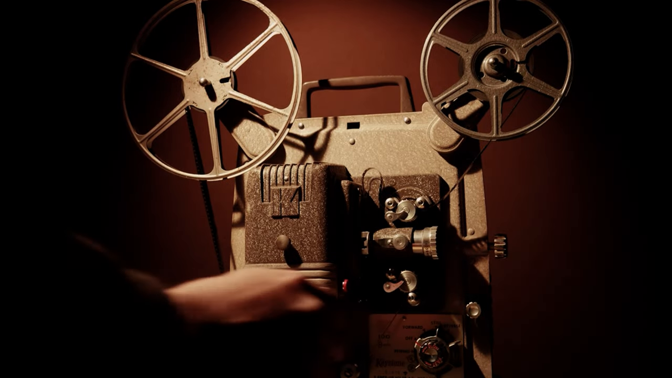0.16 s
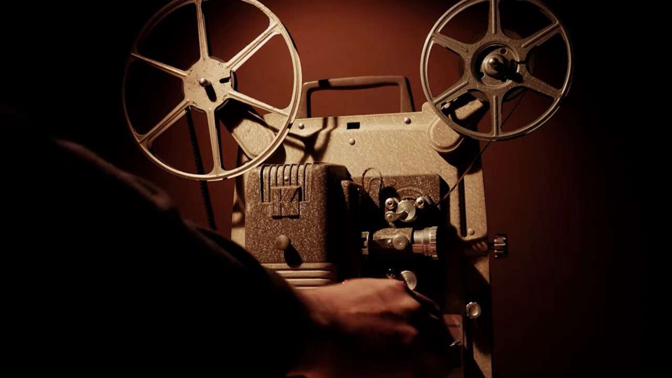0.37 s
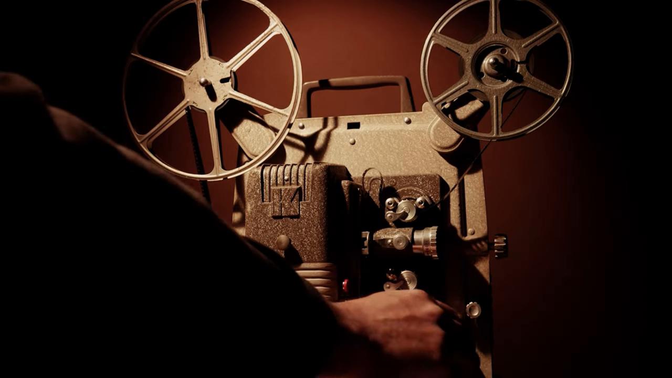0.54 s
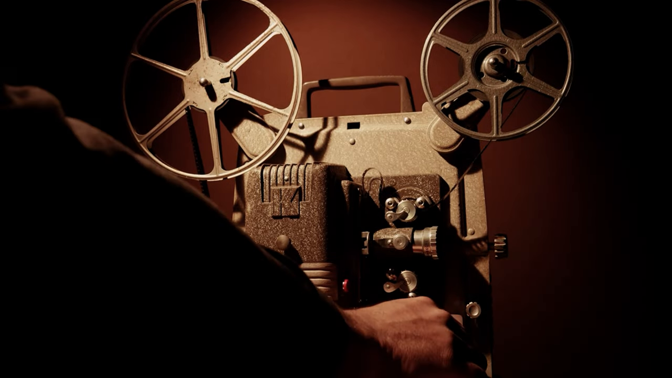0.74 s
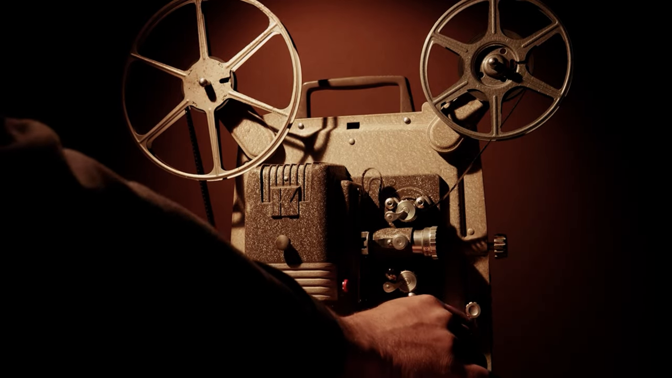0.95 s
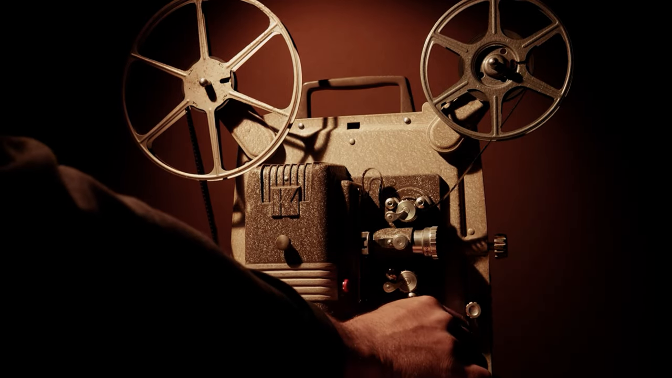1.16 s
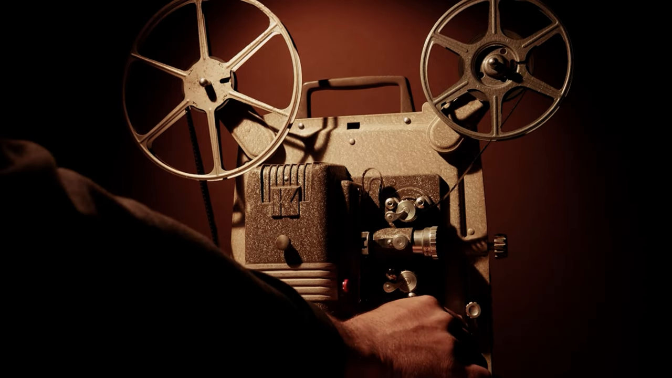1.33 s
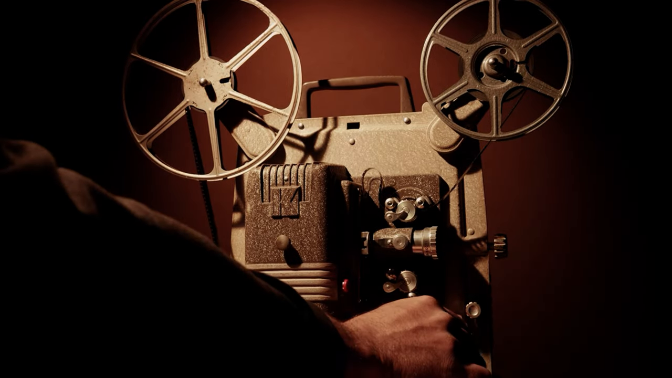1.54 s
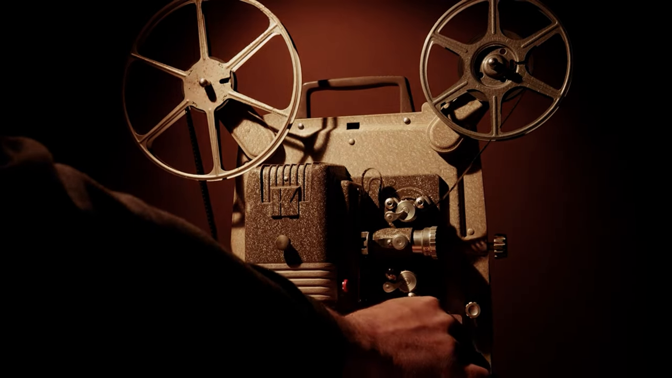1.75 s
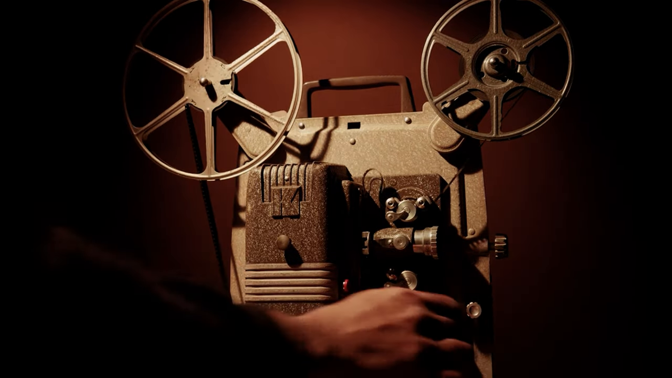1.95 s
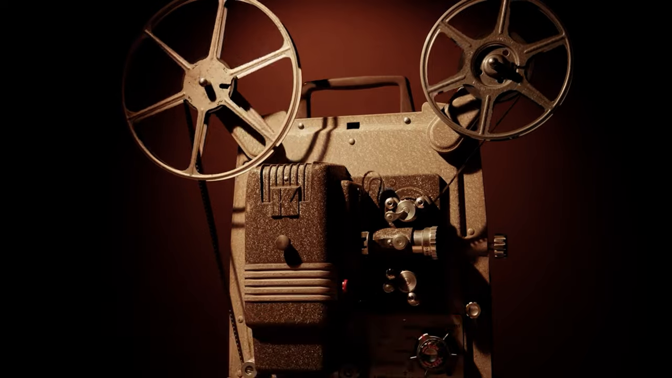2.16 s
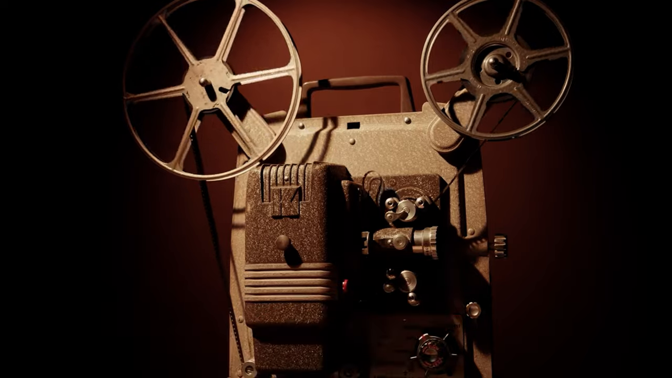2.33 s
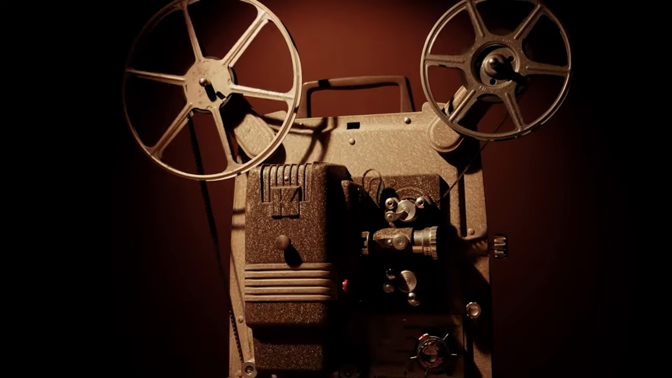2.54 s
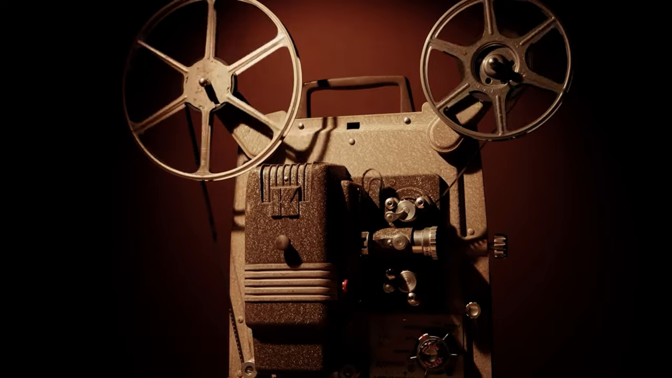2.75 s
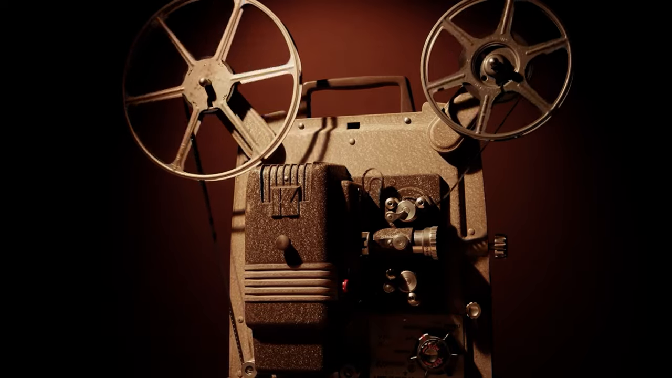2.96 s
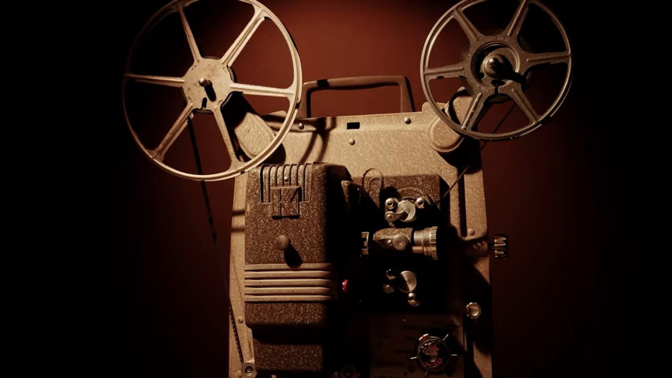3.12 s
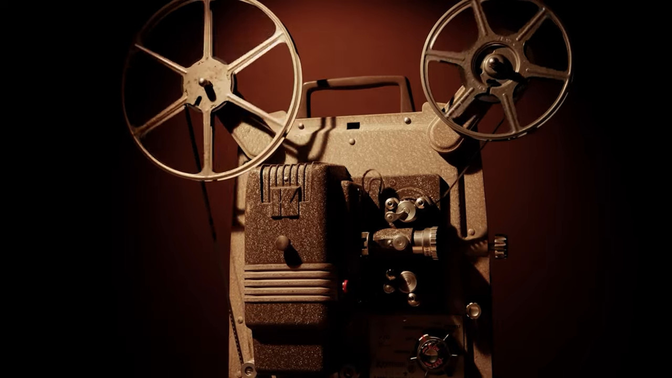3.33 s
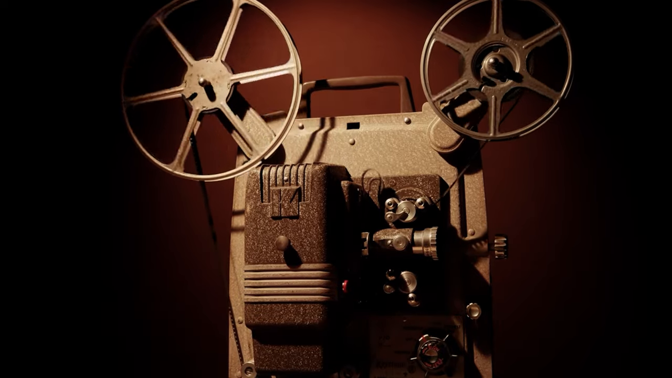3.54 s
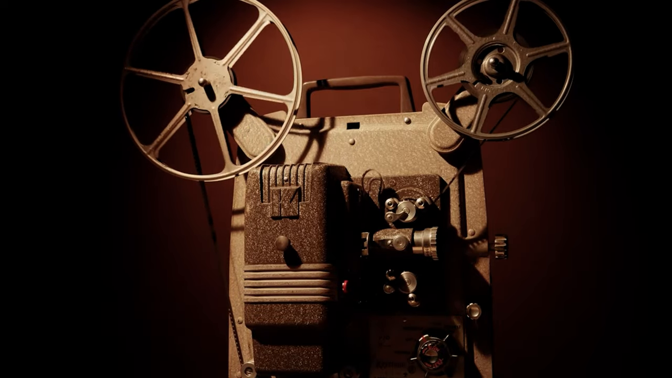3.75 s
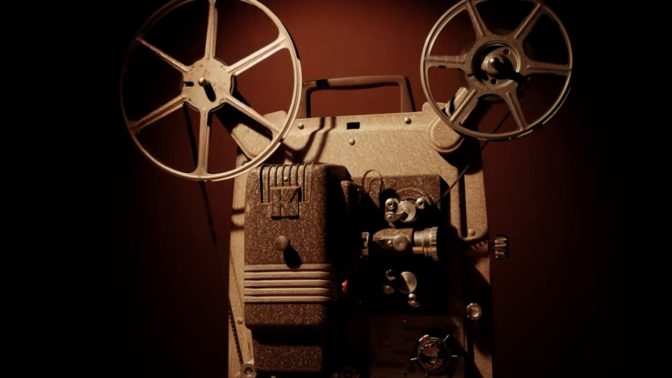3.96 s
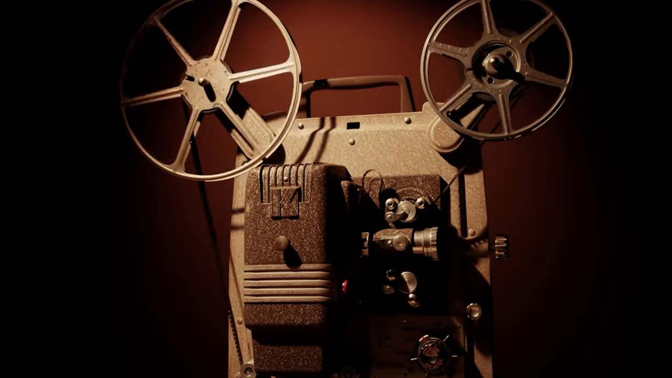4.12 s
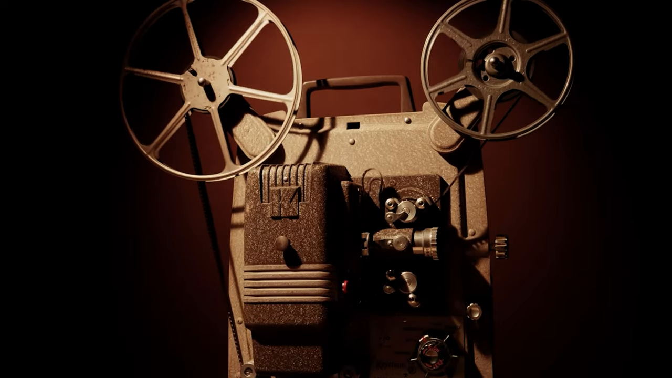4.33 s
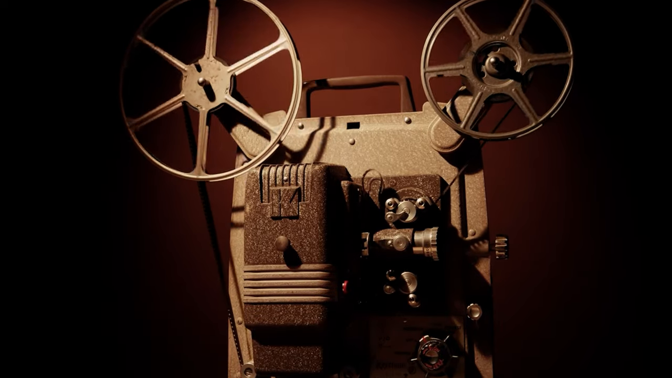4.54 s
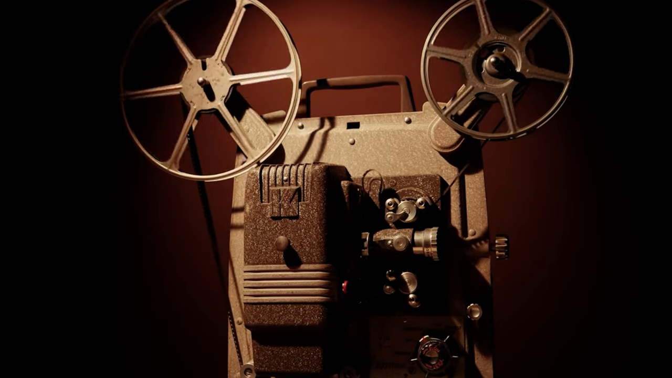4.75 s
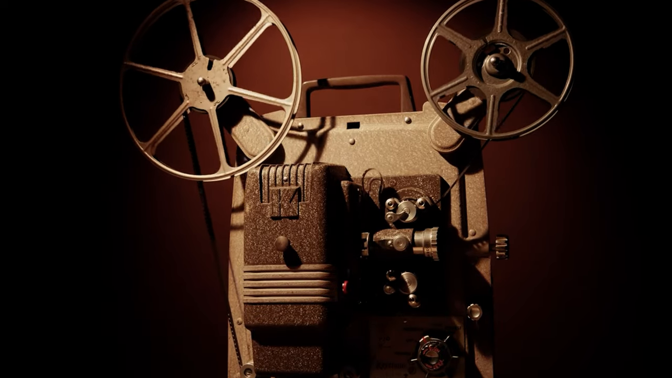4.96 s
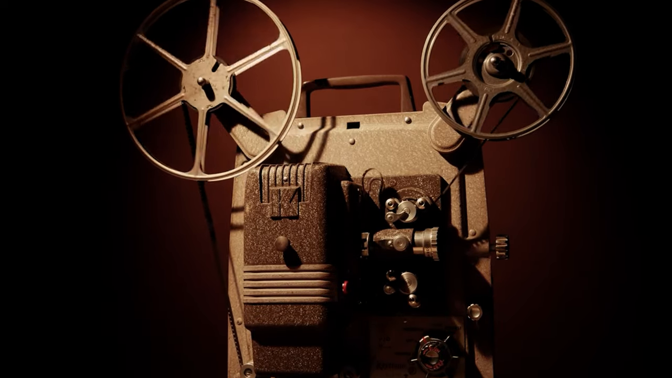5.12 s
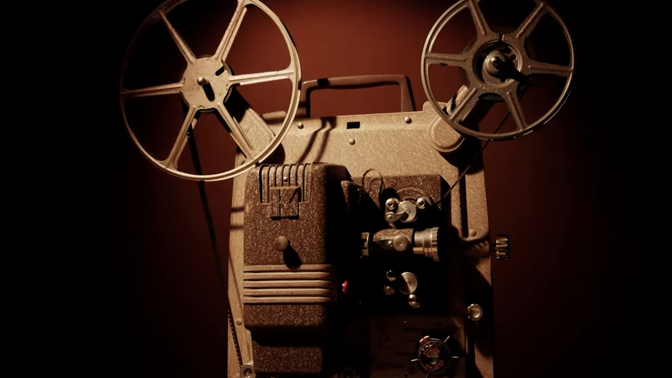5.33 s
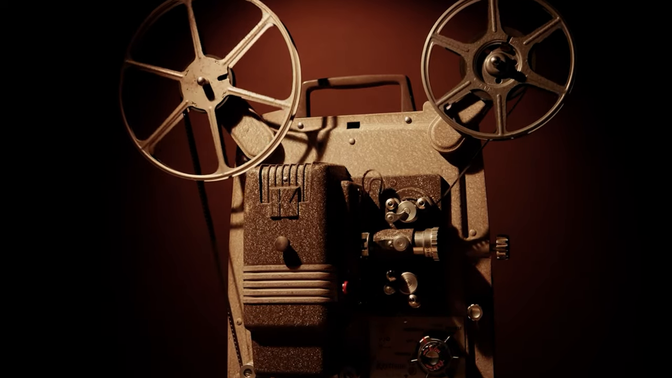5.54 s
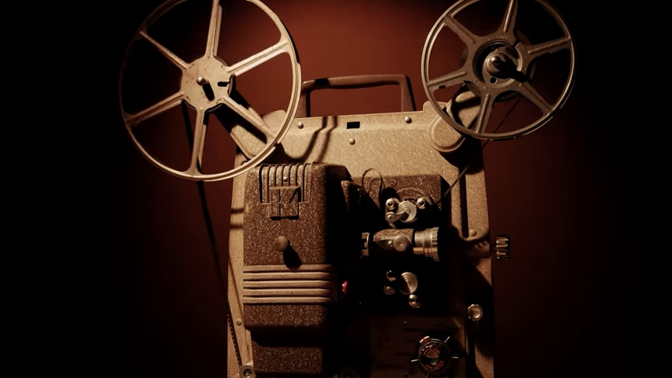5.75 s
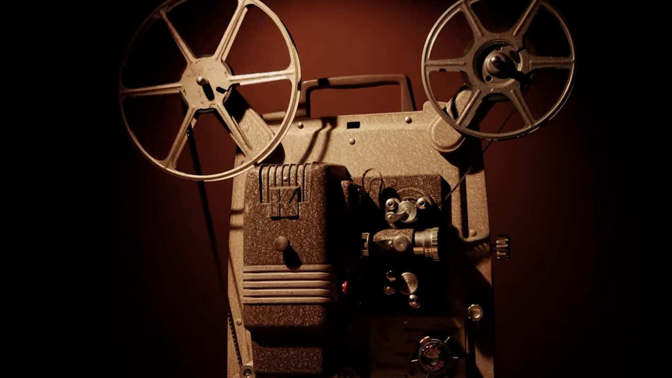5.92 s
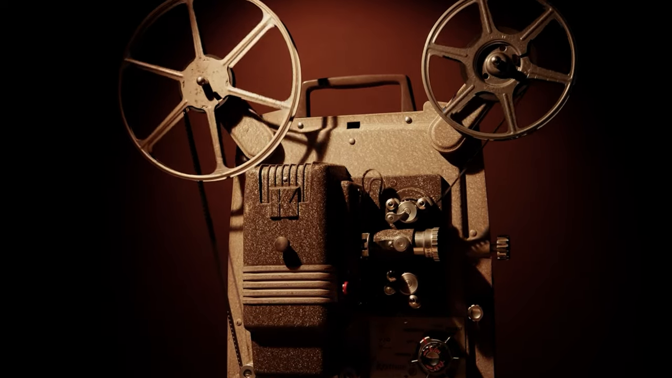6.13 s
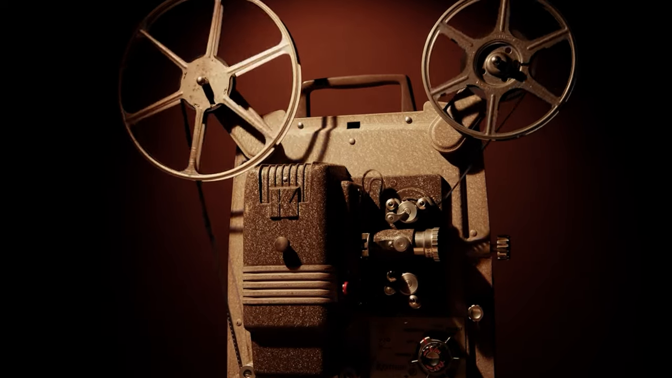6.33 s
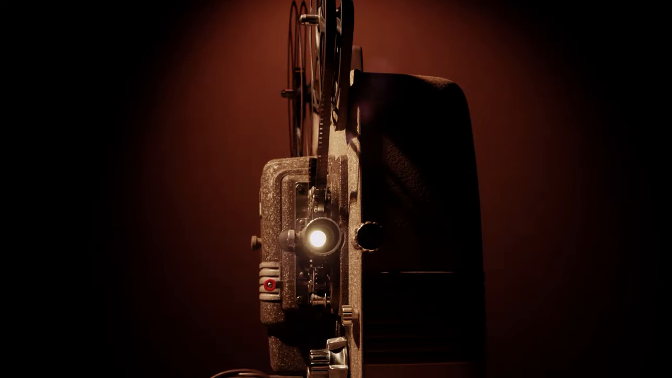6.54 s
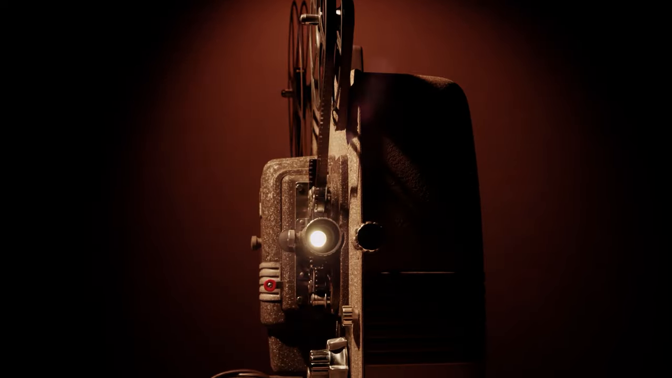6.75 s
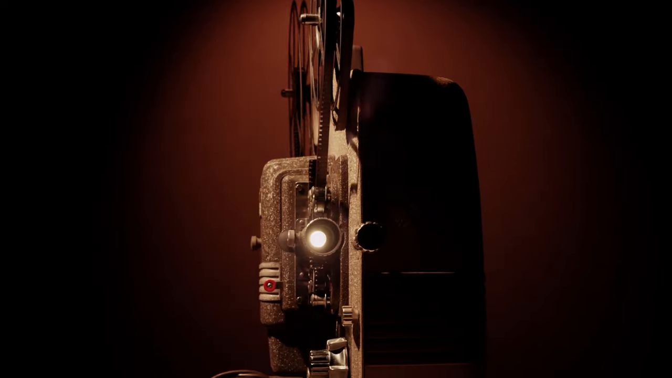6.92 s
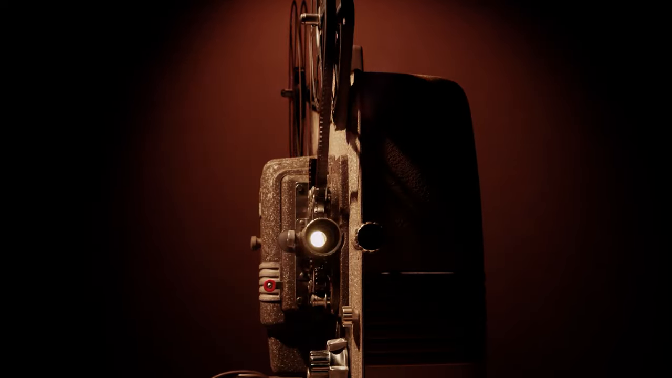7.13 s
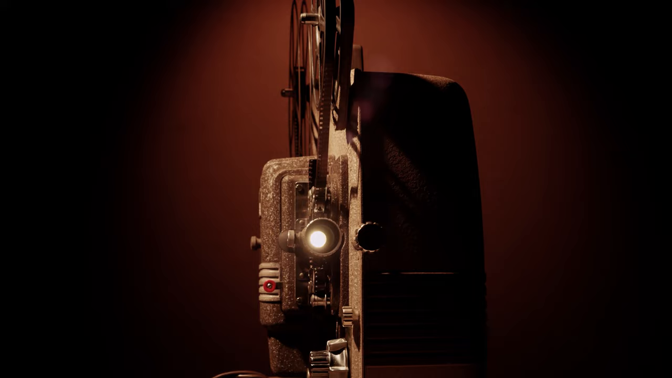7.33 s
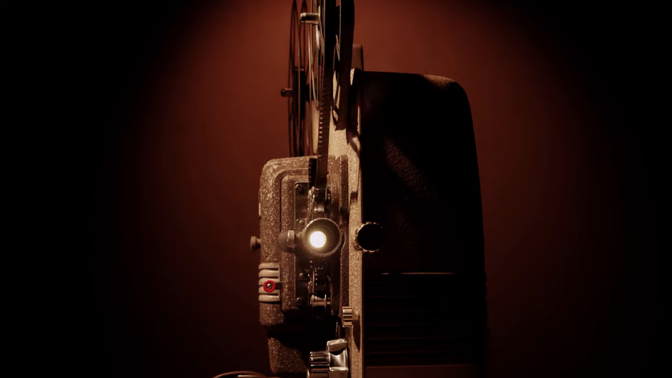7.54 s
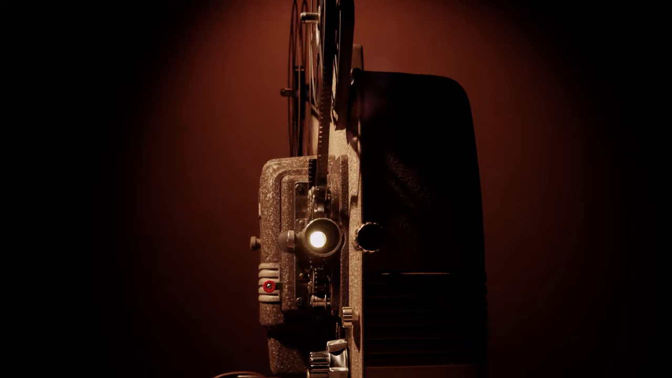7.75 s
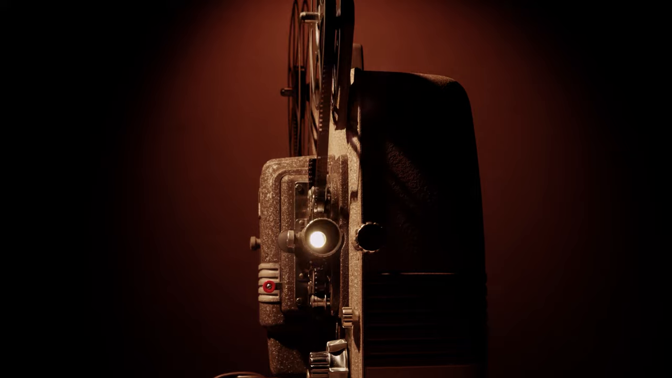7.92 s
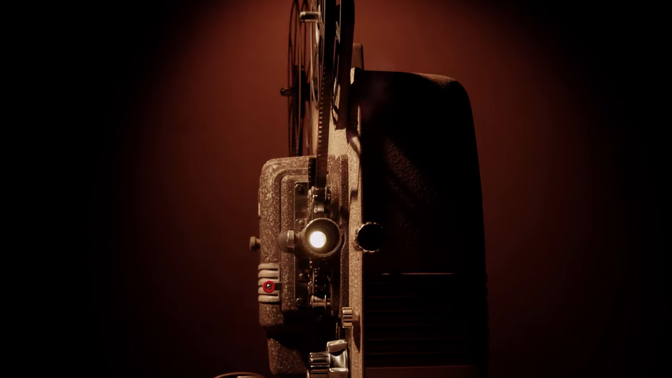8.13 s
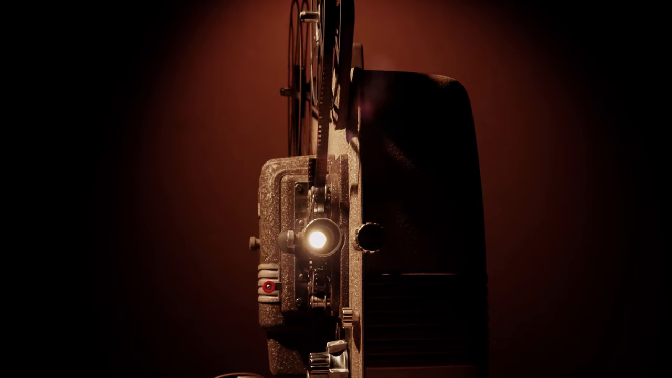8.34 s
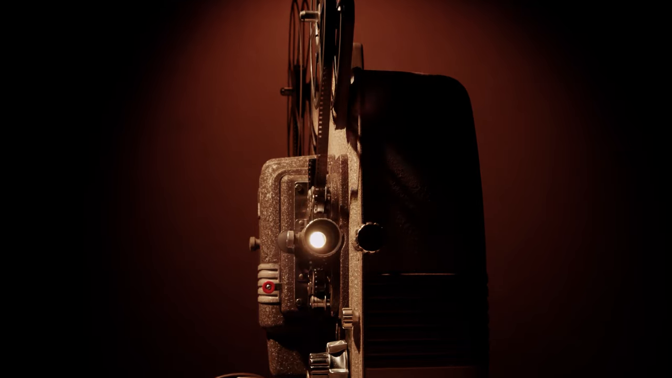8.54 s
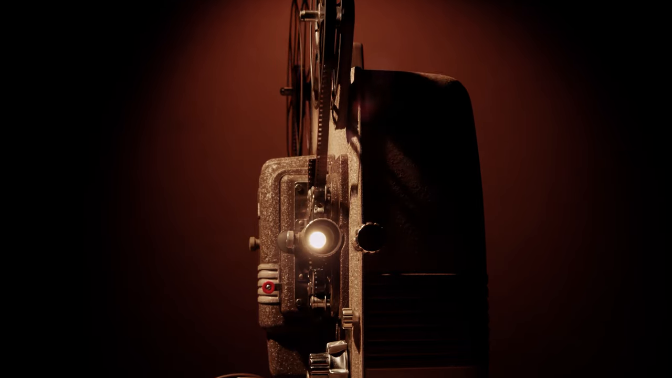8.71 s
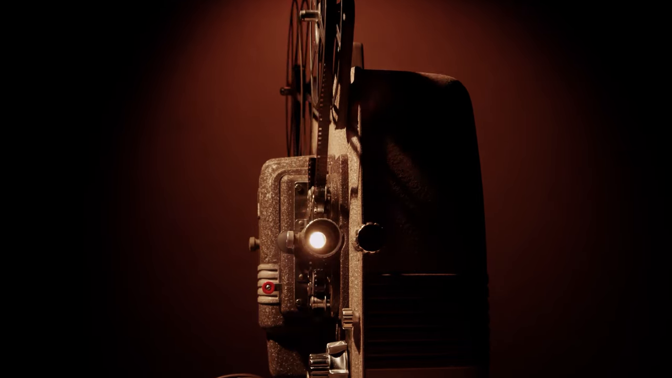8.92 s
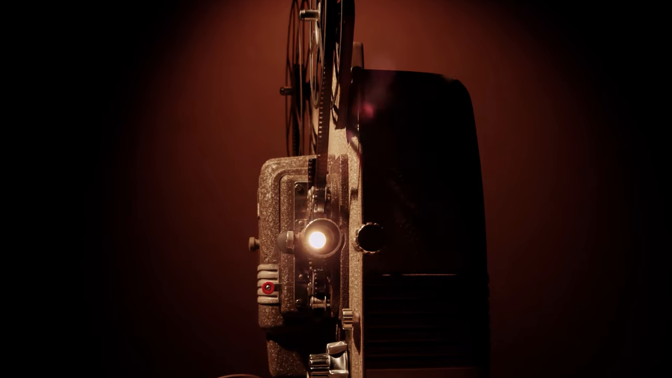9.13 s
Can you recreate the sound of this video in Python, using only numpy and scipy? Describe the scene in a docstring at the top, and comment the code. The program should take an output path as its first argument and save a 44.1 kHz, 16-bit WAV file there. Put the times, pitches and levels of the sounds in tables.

```python
"""An old film projector on a table in a small room, heard from close by.
A hand fumbles at the controls with soft knocks and a rustling sleeve, then the switch snaps over.
The motor hums and the gears run up to a whirr, made of shaped noise and tones locked to the shaft.
Then the claw pulls film, some 18 frames a second, each pull a round of short noise bursts and ringing modes:
it rings more as the loose film tightens, and sounds drier once the film has slipped into its seat."""
import sys
import numpy as np
from scipy import signal
from scipy.fft import rfft, irfft, next_fast_len
from scipy.io import wavfile

SR = 44100
rng = np.random.default_rng(int(sys.argv[2]) if len(sys.argv) > 2 else 0)


def pcm_store(signal):
    """Save signal as 16-bit PCM."""
    levels = np.round(np.clip(np.atleast_2d(signal), -1, 1) * 32767)
    wavfile.write(sys.argv[1], SR, levels.astype(np.int16).T)


N = 409248
TIME = np.arange(N) / SR  # s

# The run has three stages: the motor idles, the claw catches the loose film, the film slips into its seat.
MOTOR_ON_S, FILM_CAUGHT_S, FILM_SEATED_S = 1.825, 3.178, 5.0836
GEARS_ENGAGE_S = 1.914
SETTLE_S = 0.043  # time constant of easing into a new stage
LOOSE_PULL_DB = 2.5  # force of the usual pull on loose film

# speed of the shutter shaft: (idle, loose, seated [frames per s])
FRAME_RATES = (18.6, 18.3665, 18.4036)
# frames of each stage, counted from the catch: (first, one past the last)
IDLE_FRAMES = (-21, 0)
LOOSE_FRAMES = (0, 35)
SEATED_FRAMES = (35, 113)
# pulls that snag and ping the gate: (time [s], level re the usual pull [dB], ping level [dB], pitch [Hz])
SNAGS = [(5.25, 2.5, -17.5, 3400), (5.30, 0, -16, 6900), (5.57, 1, -18, 3400), (5.95, 1, -27, 2400),
         (6.0, -1, -28, 3600), (6.17, 2.5, -20, 6400), (6.22, 1.5, -13, 2970), (6.44, 1, -17, 3800),
         (6.61, -0.5, -15, 3380), (7.15, 1, -21, 3300), (7.75, 1, -17, 5100), (7.8, 0.5, -15.5, 3400),
         (7.85, -1, -17, 7200), (7.91, 0, -11.5, 6400), (8.07, 1.5, -23, 5200), (8.18, 1, -24, 4800),
         (8.34, 0.5, -24, 6600), (8.4, 0.5, -22, 3500), (8.72, 1, -23, 4400), (8.78, -1, -17, 4800),
         (8.83, -2.5, -27, 4400), (8.94, -2, -25, 4450), (9.05, 1, -18, 3900)]


def from_db(db):
    """Turn decibels into a gain."""
    return 10 ** (np.asarray(db) / 20)


def at_hz(points, hz):
    """Read a spectrum between its points, on a log-frequency axis."""
    known_hz, values = np.transpose(points)
    return np.interp(np.log(hz + 1), np.log(known_hz + 1), values)


def drift(rate):
    """A random wander: straight lines between normal draws of spread 1, with rate new draws a second."""
    steps = rng.standard_normal(N // 8)
    return np.interp(TIME * rate, np.arange(len(steps)), steps)


def by_stage(values, settle_s, start_s=MOTOR_ON_S):
    """A quantity that is zero at rest and eases to its idle, loose and seated value in turn."""
    steps = np.diff(values, prepend=0)
    starts = (start_s, FILM_CAUGHT_S, FILM_SEATED_S)
    return sum(step * (1 - np.exp(-np.maximum(TIME - s, 0) / settle_s)) for s, step in zip(starts, steps))


def body(x, colour, rings=(), size=8192):
    """A solid body filters what drives it: a broad colour with resonances standing out, at unit energy."""
    hz = np.arange(size // 2 + 1) * SR / size
    db = at_hz(colour, hz)
    for centre, width, boost in rings:
        db = db + boost / (1 + (2 * (hz - centre) / width) ** 2)
    cepstrum = irfft(np.log(from_db(db)))
    cepstrum[1:size // 2] *= 2  # minimum phase: nothing rings before it is struck
    cepstrum[size // 2 + 1:] = 0
    response = irfft(np.exp(rfft(cepstrum)))
    return signal.oaconvolve(x, response / np.linalg.norm(response))[:N]


def ring(times, levels_db, hz, t60):
    """One mode, a decaying sine, set ringing by a row of blows; t60 is its time to fall 60 dB [s]."""
    clicks = np.zeros(N)
    np.add.at(clicks, np.round(times * SR).astype(int), from_db(levels_db))
    radius = from_db(-60 / (t60 * SR))
    angle = 2 * np.pi * hz / SR
    feedback = [1, -2 * radius * np.cos(angle), radius * radius]
    return signal.lfilter([0, np.sin(angle)], feedback, clicks + 1e-18)


def even_burst(decay):
    """A dying burst of chatter that holds all pitches about equally."""
    burst = decay * rng.standard_normal(len(decay))
    for _ in range(3):
        # flatten the spectrum, then hold the burst to its decay
        flat = irfft(np.exp(1j * np.angle(rfft(burst))), len(decay)) * np.linalg.norm(decay)
        burst = np.clip(flat, -2.5 * decay, 2.5 * decay)
    return burst * np.linalg.norm(decay) / np.linalg.norm(burst)


def contacts(times, levels_db, t60_ms, bright_hz, alike=1.0):
    """Parts that touch chatter briefly: each burst dies away and is partly alike from blow to blow."""
    age = np.arange(SR // 4) / SR
    decay = from_db(-60 * age / (t60_ms / 1000))
    usual = even_burst(decay)
    force = np.zeros(N + SR)
    for s, db in zip(times, levels_db):
        start = max(round(s * SR), 0)
        fresh = decay * rng.standard_normal(len(age))
        chatter = np.sqrt(alike) * usual + np.sqrt(1 - alike) * fresh
        force[start:start + len(age)] += from_db(db) * chatter
    soften = signal.butter(2, bright_hz, fs=SR, output="sos")
    return signal.sosfilt(soften, force[:N] + 1e-18)


def blows(table):
    """The force of single contacts, one for each row of a table."""
    return sum(contacts([s], [db], t60_ms, bright_hz) for s, db, t60_ms, bright_hz, *_ in table)


def shaft():
    """Frames turned since the catch: the shaft spins up, then holds the speed of each stage."""
    spin_up_s = 0.09
    stage = np.searchsorted([FILM_CAUGHT_S, FILM_SEATED_S], TIME)
    spin_up = 1 - np.exp(-np.maximum(TIME - MOTOR_ON_S, 0) / spin_up_s)
    frames = np.cumsum(np.array(FRAME_RATES)[stage] * spin_up) / SR
    return frames - np.interp(FILM_CAUGHT_S, TIME, frames)


def tautness(s):
    """How far the reels have taken up the slack and tightened the film, from 0 to 1."""
    tighten_at_s, tighten_s = 3.8, 0.67
    return np.clip((s - tighten_at_s) / tighten_s, 0, 1)


def firmness(s):
    """How far the pull on seated film has firmed up, from 0 to 1."""
    firm_up_at_s, firm_up_s = 7.48, 0.14
    return np.clip((s - firm_up_at_s) / firm_up_s, 0, 1)


def odd_db(pulls):
    """The level that uneven pulls and snags add to the pulls within half a frame of them."""
    # pulls weaker or stronger than usual, or just as strong: (time [s], level re the usual pull [dB])
    uneven_pulls = [(3.68, -4), (3.79, -2.5), (5.09, 0), (5.46, 1), (5.68, 0), (5.79, -2), (6.71, -1.5),
                    (6.93, -1), (7.26, -1.5), (8.02, -1.5), (8.62, 0)]
    half_frame_s = .5 / max(FRAME_RATES)
    odd_pulls = list(uneven_pulls) + list(SNAGS)
    return sum(db * (abs(pulls - s) < half_frame_s) for s, db, *_ in odd_pulls)


def pulls_of(frames):
    """When the claw strikes, once at each whole frame, and how hard."""
    pulls = np.interp(np.arange(*frames), shaft(), TIME)
    if frames == IDLE_FRAMES:
        # the empty tick is clearest in mid run-up and fades to either side
        clearest_s, fade_db_per_s = 2.6, 17
        return pulls, -fade_db_per_s * abs(pulls - clearest_s)
    if frames == LOOSE_FRAMES:
        slack_s = 0.0095  # loose film gives way first, so the claw meets it late
        pulls, usual_db = pulls + slack_s, LOOSE_PULL_DB
    else:
        seated_pull_db, firm_up_db = -1.45, 1.64
        usual_db = seated_pull_db + firm_up_db * firmness(pulls)
    return pulls, usual_db + odd_db(pulls)


def film_gate():
    """The claw ticks emptily, clacks in the gate on loose film, then pings it on seated film; the film hisses."""
    # light ticks of the film as the reels take up: (time [s], level [dB], t60 [ms], brightness [Hz])
    ticks = [(2.132, -36, 25, 12000), (2.141, -35, 24, 14000), (2.729, -31, 22, 13000),
             (2.937, -38, 35, 10000), (3.096, -38.5, 190, 12000), (3.135, -40, 420, 12000)]
    # colour of the gate around seated film: (frequency [Hz], level [dB])
    seated_colour = [(300, -23.5), (1000, -14.5), (2000, 2), (3200, 1), (5000, 2), (7500, -1.5), (9300, 0),
                     (11000, -4), (14000, -4.5), (16000, -24)]
    # its resonances: (frequency [Hz], width [Hz], boost [dB])
    seated_rings = [(1020, 57, 9.9), (1813, 48, 12.2), (2400, 240, 3.6), (3400, 300, 1.4), (4300, 86, 4.8),
                    (4480, 60, 5.2), (5290, 110, 5), (6750, 940, 9.3), (14000, 700, 1.7)]
    # claw contacts on seated film: (delay after the pull [ms], level [dB], t60 [ms], brightness [Hz])
    seated_contacts = [(0.0499, -14, 13.6, 9000), (2.197, -18, 26, 18000), (4.125, -20.5, 19, 11000),
                       (25.3, -20.5, 37, 2200), (31.5, -26, 24, 2100)]
    seated = claw(SEATED_FRAMES, seated_contacts, jitter_ms=.35, uneven_db=1.37, alike=0.28)
    seated = body(seated + blows(ticks), seated_colour, seated_rings)
    return empty_claw() + loose_claw() + clack() + seated + pings(uneven_db=0.5) + sliding_film()


def claw(frames, cycle, jitter_ms, uneven_db, alike):
    """The same round of contacts comes with every frame; the later ones bounce less regularly."""
    pulls, pull_db = pulls_of(frames)
    force = np.zeros(N)
    for k, (delay_ms, db, t60_ms, bright_hz) in enumerate(cycle):
        early, strong = rng.standard_normal((2, len(pulls)))
        times = pulls + (delay_ms + jitter_ms * np.sqrt(k) * early) / 1000
        force += contacts(times, pull_db + db + uneven_db * strong, t60_ms, bright_hz, alike)
    return force


def loose_claw():
    """The claw's contacts with loose film, coloured by the gate; most of the chatter returns with every pull."""
    # contacts in each frame: (delay after the pull [ms], level [dB], t60 [ms], brightness [Hz])
    loose_contacts = [(0.051, -17.5, 13.5, 14000), (1.508, -11.5, 15.6, 4850), (4.18, -15, 12, 3500),
                      (14, -28.5, 107, 4100), (24.5, -25, 21, 2000), (30.5, -21, 28, 2500)]
    # colour of the gate around loose film: (frequency [Hz], level [dB])
    loose_colour = [(300, -29), (1000, -14.5), (2000, -7), (3200, -5), (5000, -4), (7500, 1.5),
                    (10000, -1.5), (14000, -1.5), (16000, -9)]
    # its resonances: (frequency [Hz], width [Hz], boost [dB])
    loose_rings = [(1795, 78, 11.8), (1980, 38, 6.9), (2450, 340, 8.9), (3800, 400, 6.1), (4400, 460, 8.1),
                   (5240, 200, 7.3), (5700, 260, 3.9), (6800, 350, 8.8), (9200, 400, 5.5),
                   (11000, 500, 6.1), (13700, 570, 3.4)]
    force = claw(LOOSE_FRAMES, loose_contacts, jitter_ms=0.039, uneven_db=1.5, alike=0.74)
    return body(force, loose_colour, loose_rings)


def clack():
    """Each pull on loose film knocks the gate's modes, and the claw knocks them again lightly as it lets go."""
    # modes of the gate: (frequency [Hz], level [dB], t60 [s], change once the film is taut [dB])
    gate_modes = [(2356, -22.5, 0.027, 6.5), (2520, -33, 0.014, 8), (3630, -34, 0.012, 9),
                  (3900, -34, 0.015, 9), (4040, -26, 0.029, 8.5), (4270, -22.5, 0.026, -1),
                  (4590, -21, 0.015, -16), (5265, -18, 0.023, -3), (6960, -23, 0.018, -0.5)]
    gate_lag_s, release_s, release_db = 0.0006, 0.0148, -15
    pulls, pull_db = pulls_of(LOOSE_FRAMES)
    times = np.append(pulls + gate_lag_s, pulls + release_s)
    out = np.zeros(N)
    for k, (hz, db, t60, taut_db) in enumerate(gate_modes):
        level_db = pull_db - LOOSE_PULL_DB + db + taut_db * tautness(pulls)
        levels_db = np.append(level_db, level_db + release_db)
        out += (-1) ** k * ring(times, levels_db, hz, t60)  # neighbouring modes swing opposite ways
    return out


def pings(uneven_db):
    """Every pull on seated film rings the gate faintly; a snag rings the modes near its own pitch loudly."""
    # modes of the gate: (frequency [Hz], level before firming up [dB], t60 [s], change once firm [dB])
    ping_modes = [(2410, -30, 0.025, -8), (3360, -44, 0.018, -3), (3517, -41, 0.017, 7),
                  (4220, -33, 0.021, -9), (4460, -44.5, 0.022, 15), (5240, -35, 0.022, -3),
                  (6470, -36, 0.014, -5), (6930, -37, 0.0079, 2)]
    snag_span_oct = 0.25  # a mode this far from the snag's pitch gets 10 dB less
    pulls, _ = pulls_of(SEATED_FRAMES)
    times, _, ping_db, pitch_hz = np.transpose(SNAGS)
    snagged = pulls[abs(pulls - times[:, None]).argmin(axis=1)]
    out = np.zeros(N)
    for k, (hz, db, t60, firm_db) in enumerate(ping_modes):
        usual_db = db + firm_db * firmness(pulls) + uneven_db * rng.standard_normal(len(pulls))
        snag_db = ping_db - 10 * (np.log2(hz / pitch_hz) / snag_span_oct) ** 2
        out += (-1) ** k * ring(np.append(pulls, snagged), np.append(usual_db, snag_db), hz, t60)
    return out


def empty_claw():
    """Before it catches the film the claw only ticks, with a short bright ring of its own."""
    # contact in each frame: (delay after the pull [ms], level [dB], t60 [ms], brightness [Hz])
    idle_contacts = [(0.05, -36, 20, 9000)]
    # colour of the tick: (frequency [Hz], level [dB])
    idle_colour = [(1500, -18), (3500, -8), (4500, -5), (5200, -4), (5900, 8), (6700, -4), (8000, -12),
                   (15000, -24)]
    # modes of the claw: (frequency [Hz], level [dB], t60 [s])
    idle_modes = [(5620, -39, 0.018), (5950, -38, 0.016)]
    pulls, pull_db = pulls_of(IDLE_FRAMES)
    ringing = sum(ring(pulls, pull_db + db, hz, t60) for hz, db, t60 in idle_modes)
    force = claw(IDLE_FRAMES, idle_contacts, jitter_ms=0, uneven_db=1.0, alike=0.38)
    return ringing + body(force, idle_colour)


def sliding_film():
    """The film hisses as it slides: steady noise with a bright colour."""
    # level of the hiss: (idle, loose, seated [dB])
    slide_db = (-80, -49.5, -51)
    # its colour: (frequency [Hz], level [dB])
    slide_colour = [(1500, -8), (4000, -10), (7000, -4), (11000, 1), (15000, -19)]
    return by_stage(from_db(slide_db), SETTLE_S) * body(rng.standard_normal(N), slide_colour)


def drive():
    """The gears run up, whirr and rattle, and set the housing droning, louder with each rise in load."""
    # levels of whirr and drone, before surge and taut film: (idle, loose, seated [dB])
    whirr_db = (-36.5, -32, -30)
    drone_db = (-44, -39.5, -39)
    # gear tones, re their level under full load: (idle, loose, seated [dB])
    tones_db = (-1, -2.5, -0.5)
    # colours of the gear train and of the housing's drone: (frequency [Hz], level [dB])
    gear_colour = [(25, -10), (60, -11), (110, -7), (200, -5.5), (300, 1), (620, -2.5), (1200, -2.5),
                   (2000, -3.5), (2900, -4), (3900, -9.5), (5600, -10.5), (7500, -17), (11000, -24),
                   (15000, -37.5)]
    housing = [(100, -48.5), (260, -28.5), (340, -5), (390, 5), (440, -3), (500, -1), (580, -8.5),
               (1000, -68.5)]
    # resonances of the gear train: (frequency [Hz], width [Hz], boost [dB])
    gear_rings = [(812, 150, 3.6), (1025, 71, 5.9), (1120, 59, 5), (1440, 254, 7.4), (1850, 100, 3.5),
                  (2490, 89, 3.4)]
    surge_db, surge_at_s, surge_s = 1.6, 2.16, 0.13
    taut_drone_db = 2  # what taut film adds
    frames = shaft()
    surge = from_db(surge_db * np.exp(-((TIME - surge_at_s) / surge_s) ** 2))
    whirr_gain = surge * by_stage(from_db(whirr_db), SETTLE_S, GEARS_ENGAGE_S)
    drone_gain = surge * by_stage(from_db(drone_db), SETTLE_S, GEARS_ENGAGE_S)
    drone_gain *= from_db(taut_drone_db * tautness(TIME))
    whirr = body(meshing(frames, repeat=0.17, grain_db=2.0), gear_colour, gear_rings)
    drone = body(meshing(frames, repeat=0.015, grain_db=0.0), housing)
    tones = by_stage(from_db(tones_db), SETTLE_S) * gear_tones(frames, waver_db=2.0, slack=0.71)
    return whirr_gain * (whirr + rattle(uneven_db=1.0)) + drone_gain * (drone + tones)


def meshing(frames, repeat, grain_db, size=2400):
    """Gear teeth rub: a share of the roughness returns with each turn, the rest is fresh and grainy."""
    teeth = rng.standard_normal(size)[(frames % 1 * size).astype(int)]
    fresh = rng.standard_normal(N) * from_db(grain_db * drift(900))
    return np.sqrt(repeat) * teeth + np.sqrt(1 - repeat) * fresh / fresh.std()


def gear_tones(frames, waver_db, slack):
    """Tones locked to the shaft; play in the gears shakes level and phase, a firmer pull shifts the balance."""
    # one entry for each tone: ratio to the frame rate
    gear_orders = (3, 9, 20.95, 24.09, 27.05, 30.1, 44, 55.05, 60.78, 80.05, 99.1)
    # level re the drone, before the stage's own change [dB]
    gear_tones_db = (-18, -17.5, -13, -2.5, -9.5, -14.5, -29, -14.5, -16.5, -16, -28)
    # change once the pull is firm [dB]
    gear_tones_firm_db = (-12, -1, 1.5, -4.5, -0.5, -3, 12, -2, 6.5, -8, 2)
    out, firm = np.zeros(N), firmness(TIME)
    for order, db, firm_db in zip(gear_orders, gear_tones_db, gear_tones_firm_db):
        phase = 2 * np.pi * (order * frames + rng.random()) + slack * drift(9)
        level_db = db + firm_db * firm + waver_db * drift(14)
        out += np.sqrt(2) * from_db(level_db) * np.sin(phase)
    return out


def rattle(uneven_db):
    """Loose parts are knocked at random; each rattles more and less in spells, and its pitch wanders."""
    # loose parts in the gear train: (frequency [Hz], level re the whirr before the stage's change [dB], t60 [s])
    rattles = [(791.5, -21.5, 0.042), (1020, -18.5, 0.033), (1354, -19.5, 0.022), (1429, -13.5, 0.017),
               (1528, -17.5, 0.021), (1819, -14.5, 0.029), (2362, -17.5, 0.024), (2546, -18.5, 0.032),
               (2783, -19, 0.032)]
    # change from their usual level: (idle, loose, seated [dB])
    rattle_db = (1, -1, 1)
    touches_per_s, spells_per_s, spell_db, wander_hz = 40, 5, 2.5, 14
    out = np.zeros(N)
    for hz, db, t60 in rattles:
        touched = rng.random(N) < touches_per_s / SR
        force_db = uneven_db * rng.uniform(-1.6, 1.6, N)[touched] + spell_db * drift(spells_per_s)[touched]
        part = np.diff(ring(TIME[touched], force_db, hz, t60), prepend=0)
        # reading the part a little early or late bends its pitch
        shifted = TIME + np.cumsum(drift(spells_per_s)) * wander_hz / hz / SR
        out += from_db(db) * np.interp(shifted, TIME, part) / part.std()
    return by_stage(from_db(rattle_db), SETTLE_S) * out


def motor(waver_db, swell_s):
    """The motor's iron hums in a few partials once it is switched on, swelling as the load grows."""
    # level of each partial of the hum [dB]
    hum_partials_db = (0, -2.5, -13)
    # level of the hum before taut film: (idle, loose, seated [dB])
    hum_db = (-50, -47, -46.5)
    hum_hz, taut_hum_db = 121.05, 1.9
    partials = np.zeros(N)
    for k, db in enumerate(hum_partials_db, 1):
        wave = np.sin(2 * np.pi * (k * hum_hz * TIME + rng.random()))
        partials += from_db(db + waver_db * drift(5.7)) * wave
    gain = from_db(taut_hum_db * tautness(TIME)) * by_stage(from_db(hum_db), swell_s)
    return np.sqrt(2) * gain * partials


def switch():
    """A knob clicks into its detent, then the switch snaps over; their parts ring on as decaying modes."""
    # clicks of knob and switch: (time [s], level [dB], t60 [ms], brightness [Hz], ring of the modes [dB])
    switch_clicks = [(1.635, -26, 89, 8000, -32.5), (1.641, -33.5, 190, 6000, -60),
                     (1.798, -23, 61, 2700, -60), (1.8021, -24.5, 52, 2800, -60),
                     (1.821, -10, 23.5, 11000, -29), (1.824, -16, 93, 6400, -56),
                     (1.914, -27, 13, 15000, -65)]
    # colour of the switch: (frequency [Hz], level [dB])
    switch_colour = [(30, 1), (90, -1), (200, -4.5), (600, -9.5), (1000, 0), (1300, -2.5), (2200, 2),
                     (3200, -0.5), (4100, -2.5), (5000, -3), (7300, 0.5), (8500, -7), (13000, -6),
                     (16000, -15)]
    # its resonances: (frequency [Hz], width [Hz], boost [dB])
    switch_rings = [(1040, 170, 4), (2500, 210, 12.6), (2980, 260, 8.1), (3360, 140, 5), (3600, 110, 3),
                    (4400, 240, 5.9), (6670, 190, 4)]
    # modes of the knob and switch: (frequency [Hz], level [dB], t60 [s])
    switch_modes = [(370, -19.5, 0.95), (440, -17.5, 0.62), (925, -7, 0.1), (1015, -9, 0.09),
                    (1050, -21, 0.55), (1147, -13, 0.14), (1970, -15, 0.25), (2270, -11, 0.18),
                    (2530, -5, 0.13), (2890, -23, 0.5), (3429, -15, 0.17), (4441, -22, 0.25),
                    (4856, -17, 0.25), (4860, -1, 0.06), (7040, -21, 0.17)]
    times, *_, ring_db = np.transpose(switch_clicks)
    ringing = sum(ring(times, ring_db + db, hz, t60) for hz, db, t60 in switch_modes)
    return body(blows(switch_clicks), switch_colour, switch_rings) + ringing


def hand():
    """The hand knocks softly on the case, and bumps it and settles, which sounds its low modes."""
    # soft knocks: (time [s], level [dB], t60 [ms], brightness [Hz])
    knocks = [(0.005, -58, 320, 1100), (0.4285, -35.5, 19, 700), (0.44, -47.5, 180, 520),
              (0.572, -49, 25, 2500), (0.579, -46, 25, 3000), (0.697, -54, 40, 2530),
              (1.319, -52, 25, 3500), (1.441, -43, 20, 3000), (1.449, -50, 50, 2500), (1.53, -52, 310, 607),
              (1.635, -56, 320, 600)]
    # colour of the case: (frequency [Hz], level [dB])
    case_colour = [(30, -16), (110, -8), (180, 3), (280, -7), (410, 3.5), (600, -2.5), (1000, -10.5),
                   (2000, -19), (8000, -25)]
    # the bump and the settling: (time [s], level [dB])
    bump = [(0.4285, -47.5), (0.4733, -58)]
    # low modes of the case: (frequency [Hz], level [dB], t60 [s])
    case_modes = [(119, 1, 0.09), (205, 1, 0.076), (330, 2, 0.015), (417, 7, 0.05), (675, -7, 0.014),
                  (970, -21, 0.014)]
    times, bump_db = np.transpose(bump)
    ringing = sum(ring(times, bump_db + db, hz, t60) for hz, db, t60 in case_modes)
    return body(blows(knocks), case_colour) + ringing


def sleeve():
    """Cloth rustle, a shaped noise, swells with each move of the arm and dies away after it."""
    # moves of the arm: (time [s], length [s], level [dB], attack [s])
    sleeve_moves = [(0.0, 0.074, -69.5, 0.016), (0.428, 0.28, -66.5, 0.037), (0.928, 0.12, -73, 0.06),
                    (1.243, 0.47, -65, 0.089), (1.647, 0.36, -53.5, 0.016)]
    # colour of the rustle: (frequency [Hz], level [dB])
    rustle_colour = [(100, 5), (500, 5.5), (1200, -4.5), (3000, -7), (8000, -11), (15000, -19)]
    release_s = 0.055
    level = np.zeros(N)
    for s, length, db, attack_s in sleeve_moves:
        rise = np.clip((TIME - s) / attack_s, 0, 1)
        fall = np.exp(-np.maximum(TIME - s - length, 0) / release_s)
        level += from_db(db) * rise * fall
    return level * body(rng.standard_normal(N), rustle_colour)


def stand(sway_hz, t60, shudder_hz):
    """Jolts rock the projector in one low mode, and it shudders, most while the film runs loose."""
    # low thuds through the stand: (time [s], level [dB])
    thuds = [(0.555, -44), (1.425, -43), (1.817, -35), (3.33, -38), (3.452, -26), (3.63, -41), (3.96, -35),
             (4.08, -37), (4.39, -39), (4.6, -36), (4.85, -40)]
    # level of the shudder: (idle, loose, seated [dB])
    shudder_db = (-73, -51, -59)
    band = signal.butter(2, [shudder_hz / 2, shudder_hz * 2], "band", fs=SR, output="sos")
    shudder = signal.sosfilt(band, rng.standard_normal(N))
    shudder *= by_stage(from_db(shudder_db), SETTLE_S) / shudder.std()
    return ring(*np.transpose(thuds), sway_hz, t60) + shudder


def swells():
    """Single slow waves of pressure on the microphone, more felt than heard."""
    # slow low swells: (time [s], level [dB], width [s])
    slow_swells = [(0.95, -34, 0.033), (1.012, -37.5, 0.035), (1.075, -33.5, 0.04), (2.035, -32, 0.035)]
    wave = np.zeros(N)
    for s, db, width in slow_swells:
        span = ((TIME - s) / width) ** 2
        wave += from_db(db) * (1 - 2 * span) * np.exp(-span)  # a crest between two dips
    return wave


def still_air():
    """The still air is a faint steady noise, strongest in the bass."""
    # colour of the air: (frequency [Hz], level [dB])
    air_colour = [(15, -39), (25, 0), (43, -2), (72, 0.5), (88, -5), (326, -20.5), (560, -23), (1610, -33),
                  (7510, -35), (16000, -47)]
    air_db = -64.5
    return from_db(air_db) * body(rng.standard_normal(N), air_colour)


def room(x, wet_db, t60, dull_hz, spread):
    """A short diffuse tail of dying noise, largely shared by the two closely spaced capsules."""
    age = np.arange(SR // 2) / SR
    decay = from_db(-60 * age / t60) * (age > .004)
    mid, side = rng.standard_normal((2, len(age))) * decay
    soften = signal.butter(1, dull_hz, fs=SR, output="sos")
    tails = signal.sosfilt(soften, [mid + spread * side, mid - spread * side])
    tails *= from_db(wet_db) / np.linalg.norm(mid)
    return x + signal.oaconvolve(x[None], tails, axes=1)[:, :N]


def scatter(x, side_db, above_hz):
    """The treble comes from many small parts and reaches each capsule a little differently."""
    treble = signal.sosfilt(signal.butter(1, above_hz, "high", fs=SR, output="sos"), x)
    return from_db(side_db) * treble * drift(500) * np.array([[1], [-1]])


def off_axis(x):
    """The projector reaches the two capsules with a level and phase that vary across the range."""
    # balance of the microphone pair: (frequency [Hz], left over right [dB])
    pair_balance = [(60, 6.5), (110, 6.5), (200, 6), (380, 0.5), (700, -4.5), (1290, -4.5), (2380, -1.5),
                    (4400, 4), (8120, 6.5), (15000, -1)]
    # phase of the pair: (frequency [Hz], lead of left over right [radians])
    pair_phase = [(0, -0.26), (340, -0.87), (1290, 0.14), (3880, 0.54), (9040, -0.45), (10200, -0.77),
                  (13800, -0.77), (16400, 0.2)]
    size = next_fast_len(N + SR // 4)
    hz = np.arange(size // 2 + 1) * SR / size
    lead = np.interp(hz, *np.transpose(pair_phase))
    left = from_db(at_hz(pair_balance, hz) / 2) * np.exp(1j * lead / 2)
    return irfft(rfft(x, size) * np.array([left, 1 / left]), size)[:, :N]


def scene():
    """The projector in the room; the hand's small noises, the still air and the swells sit in the centre."""
    machine, clicks = film_gate() + drive(), switch()
    projector = room(machine, wet_db=-13.0, t60=0.19, dull_hz=7000, spread=0.26)
    projector += room(clicks, wet_db=-9.0, t60=0.33, dull_hz=8000, spread=0.28)
    projector += scatter(machine + clicks, side_db=-0.5, above_hz=11800)
    projector += motor(waver_db=0.5, swell_s=0.12) + stand(sway_hz=29.0, t60=0.28, shudder_hz=28)
    return off_axis(projector) + hand() + sleeve() + still_air() + swells()


def record(dry):
    """The sharpest peaks are rounded and the top is cut."""
    ceiling, cutoff_hz = .56, 16200
    rounded = dry / (1 + (dry / ceiling) ** 4) ** .25
    return signal.sosfilt(signal.ellip(10, .1, 80, cutoff_hz, fs=SR, output="sos"), rounded)


dry = scene()
out = record(dry)
pcm_store(out)
```